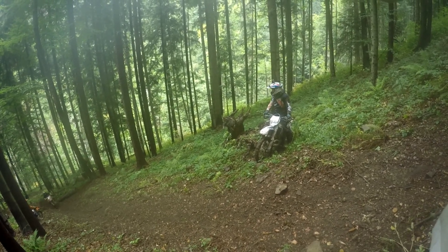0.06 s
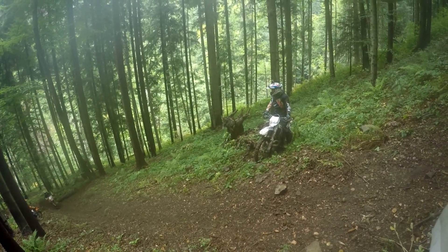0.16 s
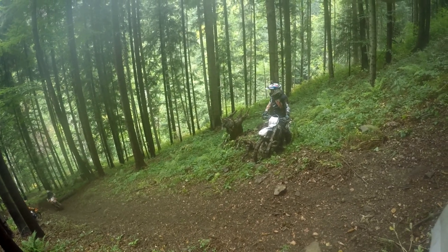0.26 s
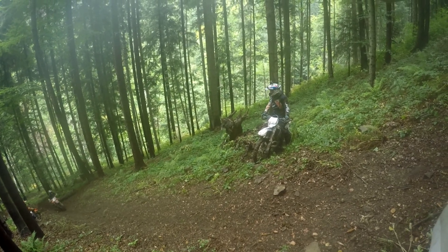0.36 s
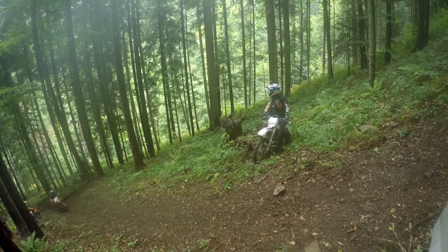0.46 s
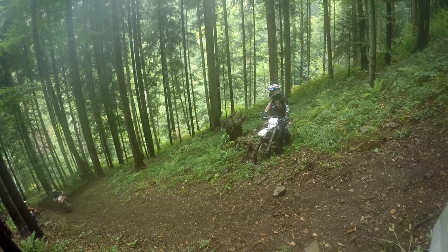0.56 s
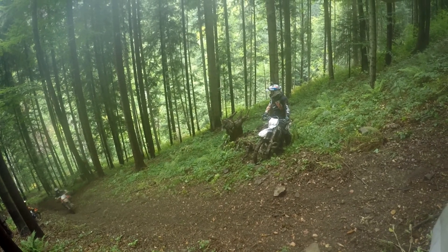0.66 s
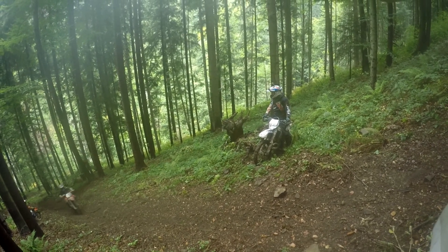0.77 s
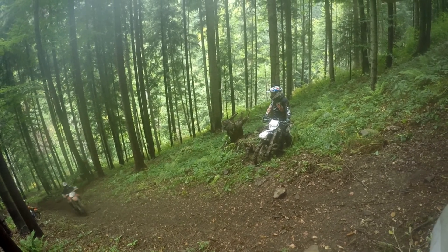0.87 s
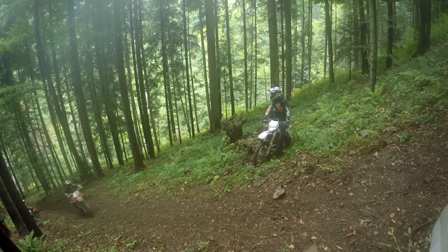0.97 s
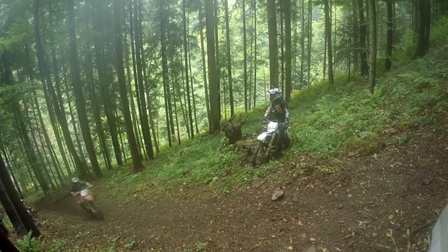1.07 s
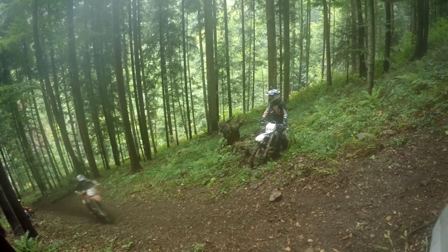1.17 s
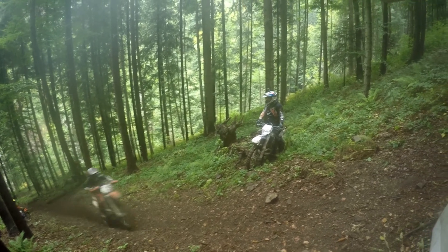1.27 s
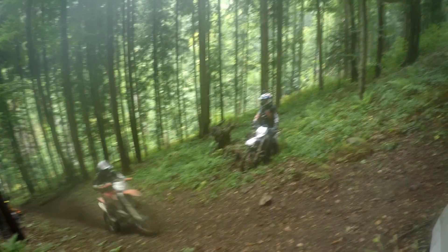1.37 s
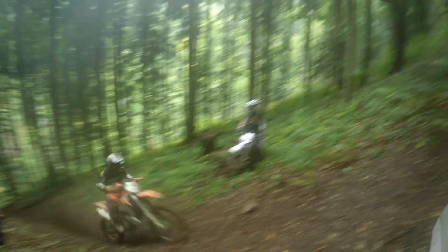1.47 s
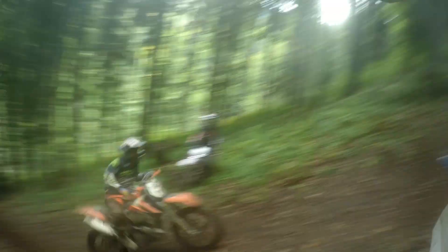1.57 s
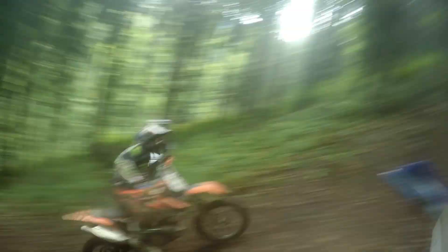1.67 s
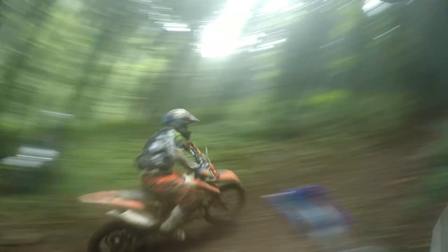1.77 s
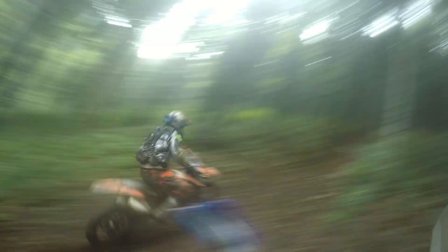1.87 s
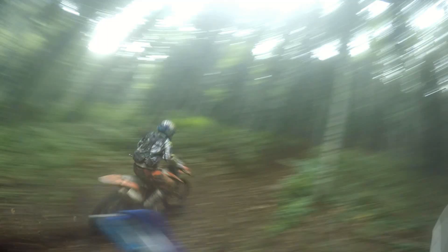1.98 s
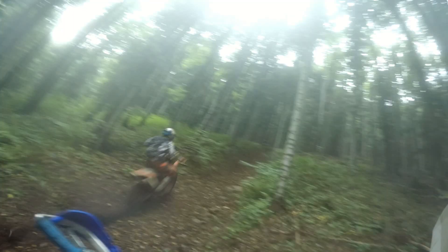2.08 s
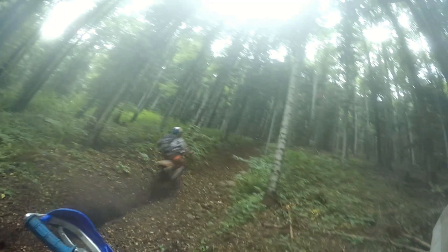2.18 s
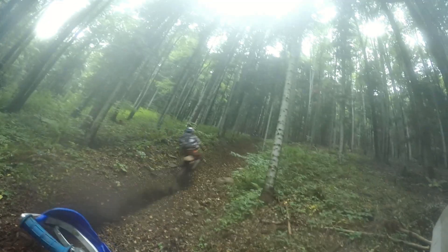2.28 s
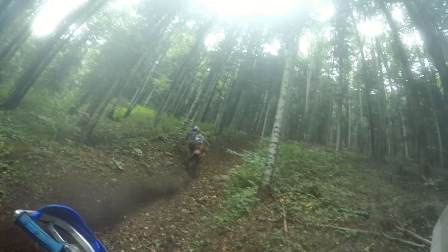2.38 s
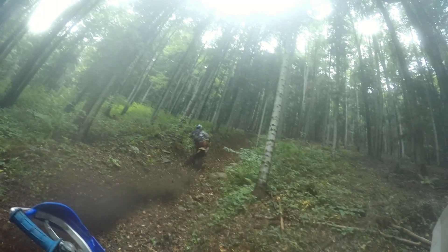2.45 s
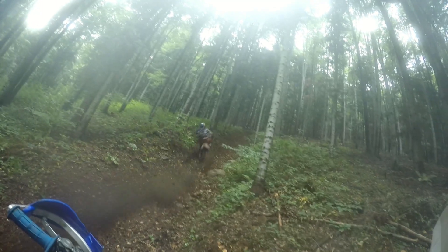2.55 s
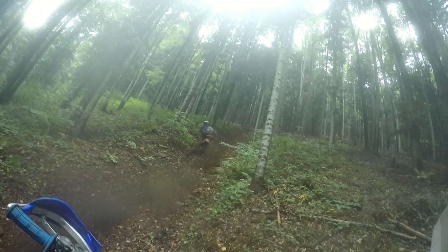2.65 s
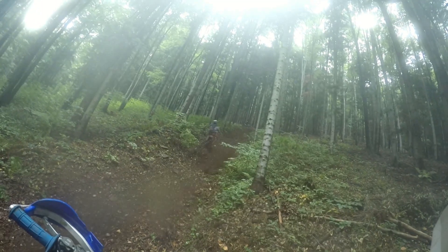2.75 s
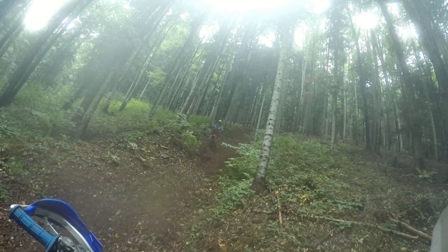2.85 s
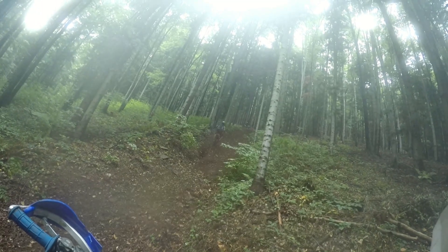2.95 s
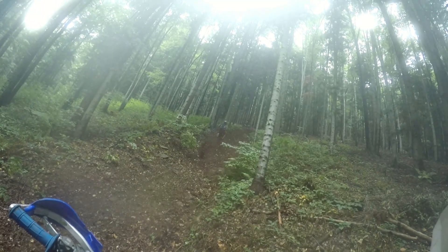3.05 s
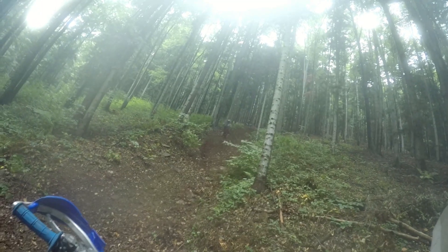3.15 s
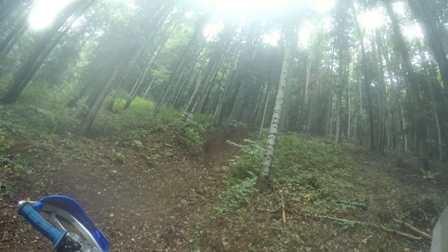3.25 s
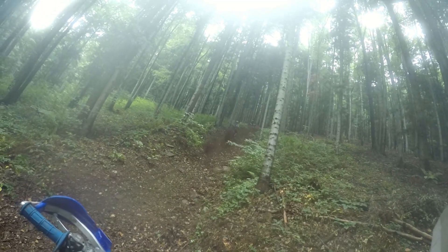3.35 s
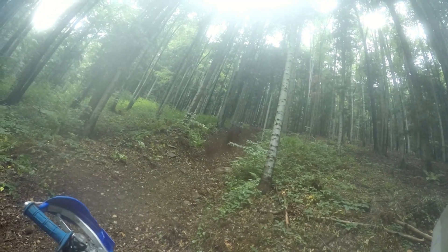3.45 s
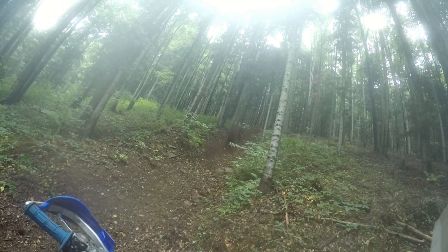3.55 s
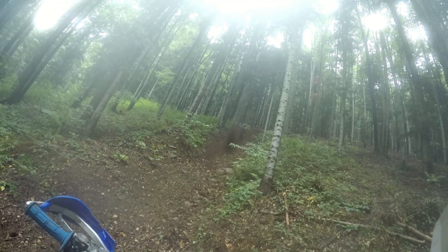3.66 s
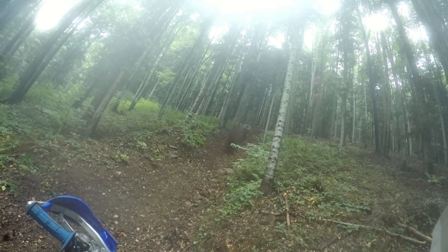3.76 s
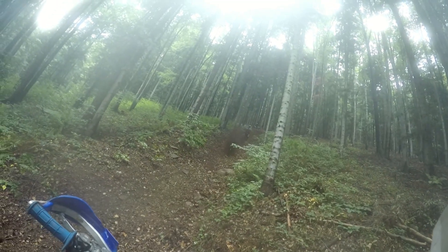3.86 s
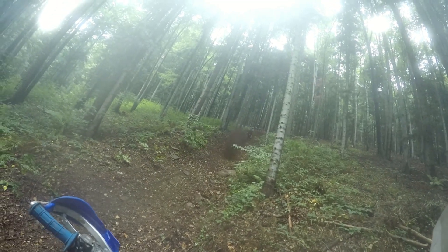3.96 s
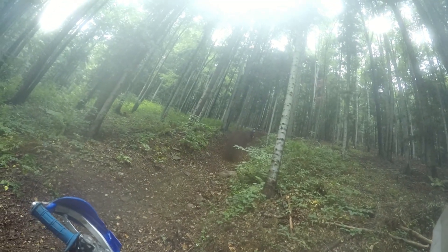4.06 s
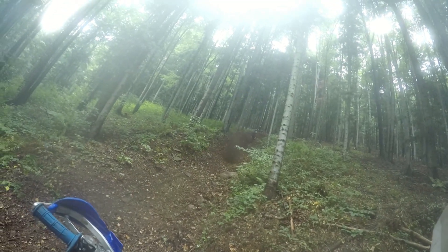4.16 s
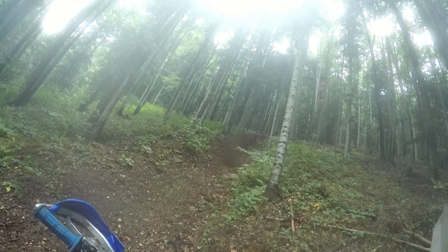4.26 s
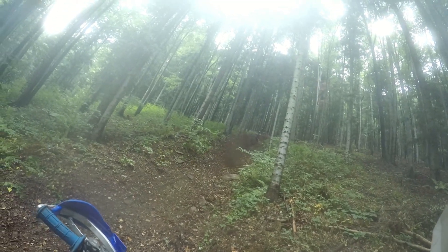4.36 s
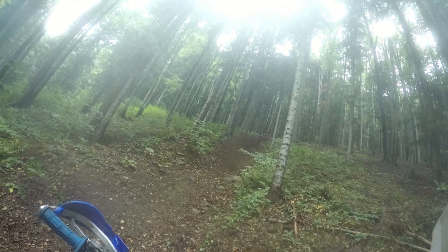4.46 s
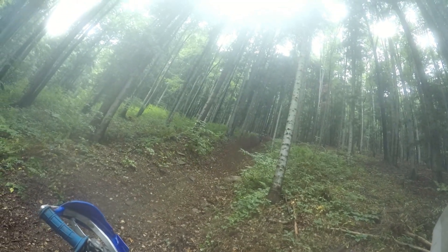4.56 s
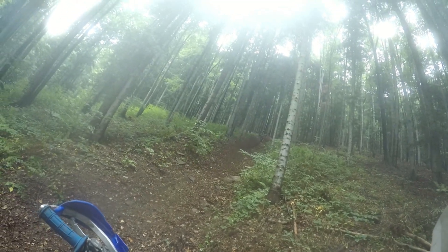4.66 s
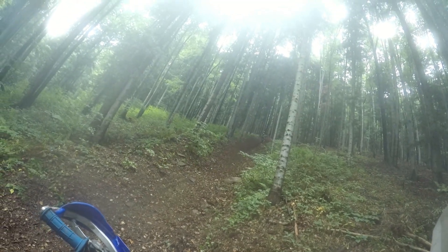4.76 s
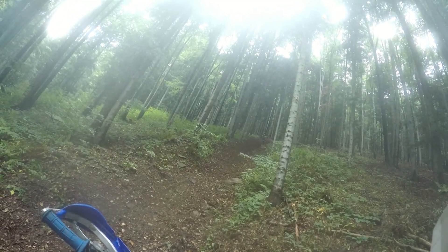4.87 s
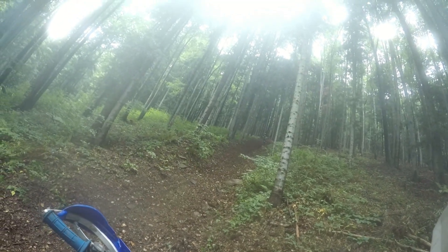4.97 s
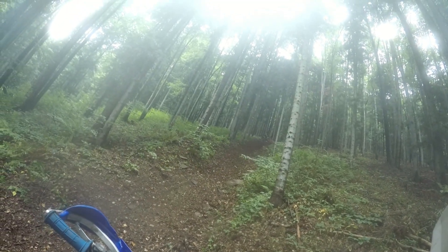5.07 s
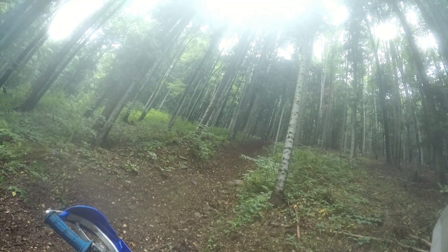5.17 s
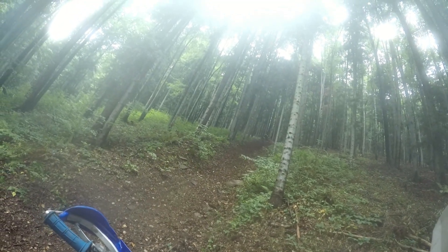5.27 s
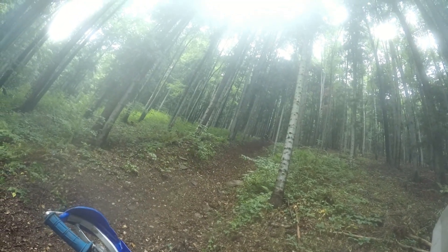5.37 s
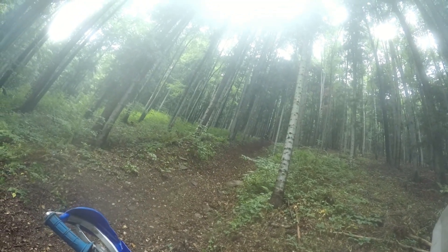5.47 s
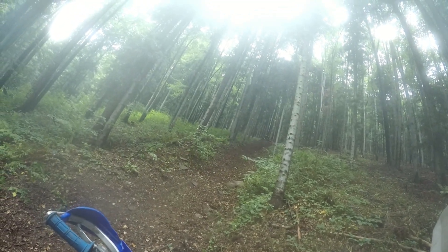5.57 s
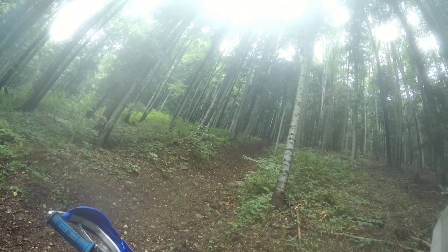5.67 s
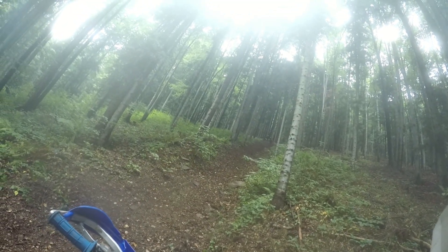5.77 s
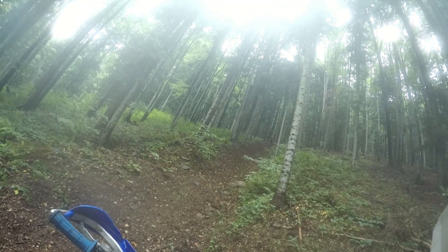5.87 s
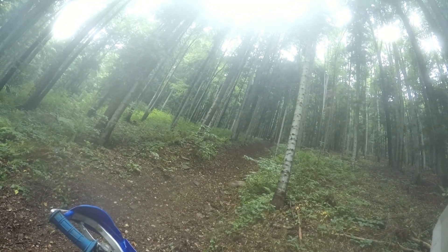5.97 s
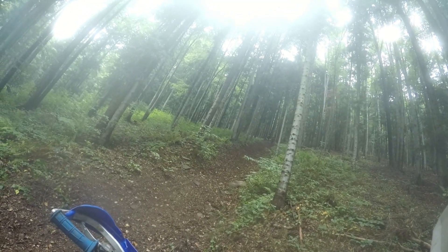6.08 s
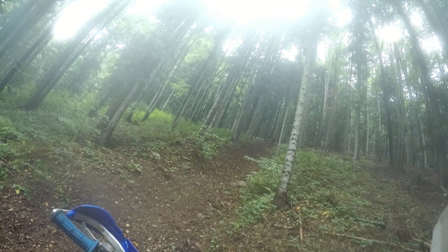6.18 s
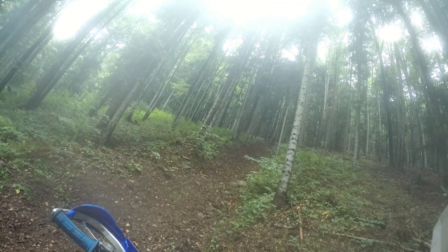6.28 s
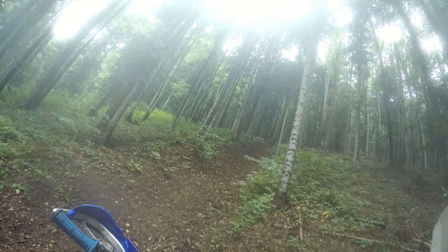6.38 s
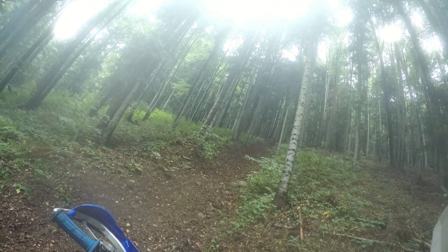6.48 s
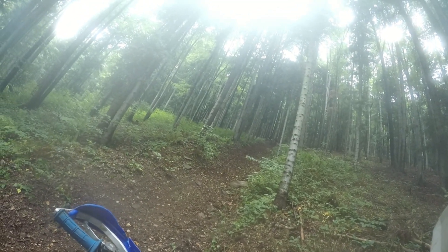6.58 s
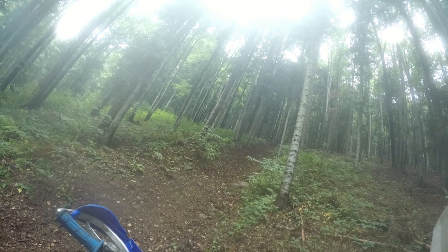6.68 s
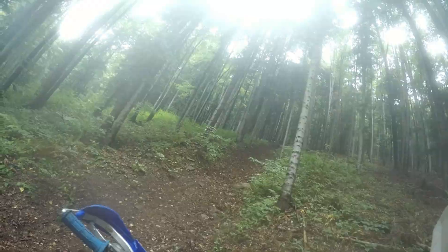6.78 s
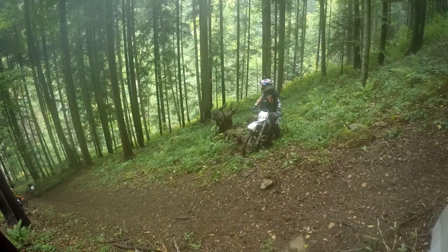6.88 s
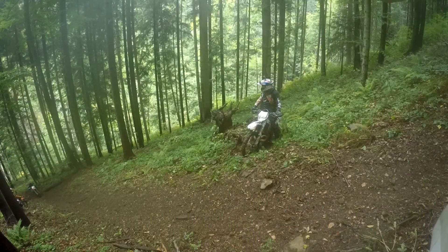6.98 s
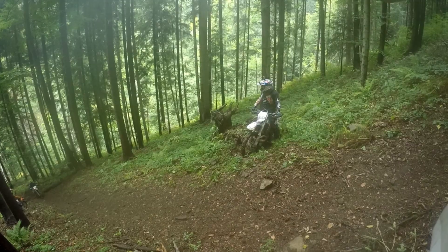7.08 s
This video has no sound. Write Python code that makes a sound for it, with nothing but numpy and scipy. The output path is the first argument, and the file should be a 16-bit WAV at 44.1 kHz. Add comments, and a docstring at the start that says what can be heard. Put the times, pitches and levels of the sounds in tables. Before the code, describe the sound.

In a hushed forest, a dirt bike approaches under hard throttle, its buzzing bark swelling to a harsh roar as it passes very close. It pulls away, shuts off briefly with a sharp crack, reopens and climbs steadily into the distance. Over a brow it drops to a faint putter, picks up weakly, then abruptly a different, quiet, low-revving bike is heard far off. Wind buffets the stationary microphone at the trailside.

```python
"""A forest trail: a dirt bike climbs, passes close by and rides off over a brow, shutting and opening the throttle.
Each firing is a pressure spike plus a puff of gas, coloured by the exhaust and scattered by trunks.
Low orders are sines with rough noise; off the throttle come an overrun whine, cracks, a pop and putter.
At 6.906 s the scene cuts to a second bike, lugging far down the trail. Light wind and forest hush run throughout."""
import sys
import numpy as np
from scipy import signal
from scipy.fft import rfft, irfft, next_fast_len
from scipy.io import wavfile
from scipy.ndimage import map_coordinates

SR = 44100
rng = np.random.default_rng(int(sys.argv[2]) if len(sys.argv) > 2 else 0)


def digitize_waveform(pressure):
    """Quantize a signal to 16-bit integers and store it at the path in sys.argv[1].

    Rows of a 2-D input are taken as channels; values are limited to [-1, 1].
    """
    field = np.atleast_2d(pressure).T
    bounded = np.clip(field, -1, 1)
    quanta = np.round(bounded * 32767).astype(np.int16)
    wavfile.write(sys.argv[1], SR, quanta)


N = 314697
T = np.arange(N) / SR

# silencer chambers: (round trip [s], share sent back [0-1])
CHAMBERS = [(.00073, .3)]
# longer path heard from behind: (round trip [s], share sent back [0-1])
TAILPIPE = [(.00171, .36)]
REAR_FROM_S, REAR_FADE_S = 2.2, 0.015
# brief bark level changes: (time [s], rise [dB], half length [s])
BARK_SWELLS = [(1.05, -1, 0.15), (1.44, 2, 0.055), (2.48, 0.5, 0.062), (4.03, 2, 0.19), (6.4, 2.5, 0.062)]


def exhaust(turns):
    """Pitched bark of pressure spikes; towards the treble, puffs of gas take over."""
    scattered, hiss = diffuse("scatter"), diffuse("hiss")
    spikes = ringing(firings(turns, scatter_db=1.1, slip_s=0.000014), CHAMBERS)
    from_behind = ringing(spikes, TAILPIPE)
    spikes = blend(spikes, from_behind, (T - REAR_FROM_S) / REAR_FADE_S)
    spikes = bounced(scatter(spikes, scattered, t60=0.19))
    # scattering smears the puffs into plain hiss
    gas = blend(puffs(turns, life=1.0), rng.standard_normal(N), scattered)

    bark_mix = blend(spikes, gas, 0.05 + 0.1 * hiss ** 6)
    rasp_mix = blend(spikes, gas, 0.03 + 0.82 * hiss)
    sizzle_mix = blend(spikes, gas, (3 + hiss) / 4)
    bark = aimed(bark_mix, lambda hz: below(hz, 2400))
    rasp = aimed(rasp_mix, lambda hz: below(hz, 7500) - below(hz, 2400))
    sizzle = aimed(sizzle_mix, lambda hz: 1 - below(hz, 7500))

    bark_db = loudness("bark") + swells(BARK_SWELLS)
    return amp(bark_db) * bark + amp(loudness("rasp")) * rasp + amp(loudness("sizzle")) * sizzle


def firings(turns, scatter_db, slip_s):
    """One band-limited spike per firing, each a little different in size and time; rms 1."""
    at = np.interp(np.arange(1, int(turns[-1])), turns, np.arange(N))
    chance = rng.standard_normal((len(at), 2))
    size = np.sqrt(np.gradient(at)) * amp(scatter_db * chance[:, 0])
    at = at + slip_s * SR * chance[:, 1]
    # windowed sinc places each spike between samples
    taps = np.floor(at)[:, None] + np.arange(-7, 9)
    offset = taps - at[:, None]
    shape = np.sinc(offset) * np.cos(np.pi * offset / 16) ** 2
    index = np.clip(taps, 0, N - 1).astype(int).ravel()
    return unit(np.bincount(index, (size[:, None] * shape).ravel(), N))


def puffs(turns, life):
    """Turbulent gas that bursts at each firing and decays over life [turns]; rms 1."""
    return unit(rng.standard_normal(N) * np.exp(-(turns % 1) / life))


def ringing(x, paths):
    """Allpass round trips draw each spike out into a metallic ring."""
    def response(hz):
        trips = [(np.exp(-2j * np.pi * hz * trip_s), back) for trip_s, back in paths]
        return np.prod([(z - back) / (1 - back * z) for z, back in trips], axis=0)
    return filtered(x, response)


# side facing the listener: (time [s], side [0 front, 1 flank, 2 rear quarter, 3 rear])
FACING = [(1.3, 0), (1.7, 1), (2.08, 1), (2.24, 2), (2.5, 2), (3, 3)]
# exhaust colour from each side: (frequency [Hz], gain [dB])
FRONT = [(650, -2), (850, -13), (1000, -7.5), (1250, 5), (1900, -1), (2300, -4), (3000, -2.5), (3800, -2),
         (4700, -5), (6500, -11.5), (8800, -14), (15000, -19.5)]
FLANK = [(650, -20), (850, -8.5), (1000, -10), (1250, 2), (1900, -7.5), (2300, -0.5), (3000, 4.5),
         (3800, -0.5), (4700, 0.5), (6500, -4), (8800, -21), (15000, -24.5)]
QUARTER = [(650, -16), (850, -0.5), (1000, -4.5), (1250, -1), (1900, -1), (2300, -3), (3000, -0.5),
           (3800, -2), (4700, -8.5), (6500, -14), (8800, -31), (15000, -40.5)]
REAR = [(650, 2), (850, -5), (1000, -10), (1250, -2.5), (1900, -3.5), (2300, 0), (3000, -5.5), (3800, 0),
        (4700, -6.5), (6500, -17), (8800, -45), (15000, -53)]


def aimed(x, band):
    """One exhaust band, changing colour as the bike turns from front to rear."""
    facing = curves(FACING)[0]
    out = np.zeros(N)
    for side, spectrum in enumerate([FRONT, FLANK, QUARTER, REAR]):
        share = 1 - abs(facing - side)
        heard = share > 0
        out[heard] += share[heard] * pipe(x[heard], spectrum, band)
    return out


# fixed peaks and notches: (centre [Hz], width [Hz], gain [dB])
RESONANCES = [(1300, 27, 2.5), (1658, 12.3, -26), (1999, 285, 8), (2286, 210, -5), (2653, 94, 8.5),
              (2856, 255, -10.5), (2990, 120, 7), (4160, 740, -1.5), (4660, 290, 4), (5280, 150, -9),
              (5332, 90, 11.5), (5960, 190, -2.5), (6420, 140, 5.5), (10510, 640, 7)]


def pipe(x, spectrum, band=lambda hz: 1, lag_s=0.001638, lag_hz=5000):
    """Pulses take on the pipe's colour and fixed resonances; their lows trail their highs."""
    hz = np.fft.rfftfreq(2048, 1 / SR)
    resonance_db = sum(db * np.exp(-((hz - centre) / width) ** 2) for centre, width, db in RESONANCES)
    gain = colour(spectrum, hz) * amp(resonance_db) * (1 - below(hz, 742))
    # folded cepstrum gives minimum phase
    cepstrum = irfft(np.log(np.maximum(gain, 1e-4)))
    cepstrum[1:1024] *= 2
    cepstrum[1025:] = 0
    sweep = np.exp(2j * np.pi * lag_s * lag_hz * np.exp(-hz / lag_hz))
    ring = np.fft.fftshift(irfft(np.exp(rfft(cepstrum)) * sweep * band(hz)))
    return signal.oaconvolve(x, ring / np.linalg.norm(ring), mode="same")


# ground reflection: (time [s], delay [ms], strength [0-1])
GROUND = [(1.72, 0.23, 0.24), (1.87, 0.35, 0.3), (1.95, 0.51, 0.35), (2.02, 0.7, 0.38), (2.28, 0.76, 0.31),
          (2.55, 0.7, 0.8)]


def bounced(x, soil_hz=3400):
    """Ground reflection sweeps a comb through the note; loose soil swallows its treble."""
    delay_ms, strength = curves(GROUND)
    late = np.interp(T - delay_ms / 1000, T, filtered(x, lambda hz: below(hz, soil_hz)))
    return (x + strength * late) / np.sqrt(1 + strength ** 2 / 2)


# brief narrow resonances: (time [s], rise [dB], half length [s], centre [Hz], width [Hz])
GLINTS = [(0.26, 9.5, 0.67, 2895, 130), (0.97, 10.5, 0.043, 1345, 102), (1.21, 7, 0.14, 1280, 100),
          (1.14, 11, 0.042, 1800, 64), (1.2, 9, 0.39, 5624, 121), (1.53, 9.5, 0.051, 5400, 150),
          (1.53, 9, 0.12, 8000, 288), (1.8, 11, 0.06, 1725, 170), (0.44, 6, .12, 1846, 110),
          (1.43, 6, 0.033, 1830, 102), (4.1, 4, 0.061, 1160, 88), (3.16, 6, 0.042, 1920, 113),
          (4.05, 5, .1, 1695, 270), (4.69, 5, 0.36, 1800, 99), (1.869, 9, .04, 2470, 214),
          (1.92, 8, 0.095, 3025, 123), (2.24, 7.5, 0.14, 3110, 188), (2.218, 4.5, 0.11, 5430, 400),
          (2.24, 7.5, 0.081, 2630, 88), (4.045, 9, 0.046, 2420, 280), (5.35, 9.5, 0.11, 3360, 210)]


def glinting(x):
    """Narrow bands of the exhaust brighten briefly, each at its own time."""
    out = x
    for s, db, half_s, centre, width in GLINTS:
        narrow = filtered(x, lambda hz: np.exp(-((hz - centre) / width) ** 2))
        out = out + (amp(swells([(s, db, half_s)])) - 1) * narrow
    return out


# second-order level: (time [s], rise [dB], half length [s])
SECOND_SWELLS = [(1.15, 1.5, .15), (1.53, -8, .11), (1.78, -8, .06), (3.1, 3, .2)]
# drone level: (time [s], rise [dB], half length [s])
DRONE_SWELLS = [(.42, 3, .12), (1.1, 2, .13), (1.42, -5, .17), (1.77, -3, .06), (3.22, 2, .08),
                (4.4, -2.5, .6)]
# flutter scale: (first order [dB], second order [dB], drone [dB])
FLUTTER_DB = 2, 3.5, 2.5
# rough low exhaust flow: (frequency [Hz], gain [dB])
CHURN = [(100, -8.5), (200, -8), (330, -3.5), (480, 3), (580, 5.5), (720, -15.5), (1000, 0), (1600, -44.5)]
FLARE_HZ, FLARE_DB_PER_HZ = 152.7, 0.5  # above this firing rate the drone gets louder
LUG_HZ, LUG_DB_PER_OCTAVE = 95.3, 6.5  # first order peaks at this firing rate


def boom(turns, front_hz=440, rear_hz=535, width_hz=120, low_db=-1, churn_db=-9):
    """Clean low orders; the higher ones swell at the silencer's resonance and roughen with distance."""
    rate_hz = np.gradient(turns) * SR
    first_db = loudness("first") - LUG_DB_PER_OCTAVE * np.abs(np.log2(rate_hz / LUG_HZ))
    second_db = loudness("second") + swells(SECOND_SWELLS)
    flare_db = FLARE_DB_PER_HZ * np.maximum(rate_hz - FLARE_HZ, 0)
    drone_db = loudness("drone") + swells(DRONE_SWELLS) + flare_db

    silencer_hz = np.interp(curves(FACING)[0], [0.5, 2.5], [front_hz, rear_hz])
    order = np.arange(3, 9)[:, None]
    weight = 1 / (1 + ((order * rate_hz - silencer_hz) / width_hz) ** 4)
    tones = weight * np.sin(2 * np.pi * order * turns + order ** 2)
    drone = np.sum(tones, axis=0) / np.linalg.norm(weight, axis=0)
    far = diffuse("drone")
    drone = scatter(drone, far, t60=0.25)

    # trail bumps jolt the load, so levels flutter
    levels_db = zip([first_db, second_db, drone_db], FLUTTER_DB)
    first_db, second_db, drone_db = [db + depth_db * wobble(21.9) for db, depth_db in levels_db]
    low = amp(first_db) * np.sin(2 * np.pi * turns) + amp(second_db) * np.cos(4 * np.pi * turns)
    clean = np.sqrt(2) * (amp(low_db) * low + amp(drone_db) * np.sqrt(1 - far / 2) * drone)
    return clean + amp(drone_db + churn_db) * np.sqrt(2 * far) * noise(CHURN)


# levels at the nearest distance: (front [dB], flank [dB], rear quarter [dB], rear [dB],
# loss [dB per tenfold distance], share of a throttle drop followed [ratio])
VOICES = {"bark": (-21, -22, -21, -15.5, 15, 1.5), "rasp": (-19.5, -16, -20, -14, 15.5, 1.28),
          "sizzle": (-33.5, -30.5, -35, -28, 21, 1.25), "first": (-27.5, -33, -26.5, -17.5, 28.5, 1),
          "second": (-29.5, -24, -35.5, -30, 24, 1), "drone": (-25, -27.5, -23, -15.5, 26.5, 1.4)}
BROW_S, BROW_FADE_S, BROW_DB = 4.986, 0.6, -6  # hill brow hides the bike


def loudness(voice):
    """Level [dB] of one exhaust voice from heading, distance, throttle and brow."""
    *sides_db, loss_db, follows = VOICES[voice]
    heading_db = np.interp(curves(FACING)[0], np.arange(len(sides_db)), sides_db)
    brow_db = BROW_DB * np.clip((T - BROW_S) / BROW_FADE_S, 0, 1)
    return heading_db - loss_db * np.log10(distance() / NEAREST_M) + follows * throttle() + brow_db


PASS_S, NEAREST_M, SPEED_M_PER_S = 1.646, 2.91, 10.55


def distance():
    """Distance [m] to a bike passing in a straight line at steady speed."""
    return np.hypot(NEAREST_M, SPEED_M_PER_S * (T - PASS_S))


# throttle lifts: (shut [s], reopen [s], drop [dB], closing time [s])
LIFTS = [(2.535, 2.875, -7, 0.06), (2.581, 2.632, -2, 0.051), (2.804, 3.068, -2.5, 0.25),
         (5.231, 6.227, -9.5, 0.4), (6.429, 6.762, -4, 0.032)]
REOPEN_S = 0.087


def throttle():
    """Drop [dB] from full throttle: each lift closes, holds and reopens."""
    total_db = 0
    for shut, reopen, db, close_s in LIFTS:
        closing = np.clip((T - shut) / close_s, 0, 1)
        total_db = total_db + db * closing * np.clip(1 - (T - reopen) / REOPEN_S, 0, 1)
    return total_db


# half-diffuse distance at full throttle: (pipe facing away [m], pipe facing listener [m])
CLEAR_M = {"scatter": (3.2, 40), "hiss": (1.2, 12), "drone": (7.5, 42)}
SWING_S, SWING_TIME_S = 1.83, 0.14


def diffuse(kind):
    """Diffuse share [0-1]: high when the bike is far, its pipe points away or the throttle is shut."""
    away_m, towards_m = CLEAR_M[kind]
    in_view = (1 + np.tanh((T - SWING_S) / SWING_TIME_S)) / 2
    clear_m = away_m * (towards_m / away_m) ** in_view * amp(throttle())
    return distance() ** 2 / (distance() ** 2 + clear_m ** 2)


def scatter(x, share, t60):
    """Part of the sound arrives via the trunks, along paths that change over time."""
    angle = np.pi * T / 0.45
    places = np.cos(angle) * trunks(x, t60) + np.sin(angle) * trunks(x, t60)
    return blend(x, places, share)


def trunks(x, t60):
    """Dense decaying echoes from the trees: convolution with a noise tail of unit energy."""
    t = np.arange(SR) / SR
    tail = rng.standard_normal(SR) * amp(-60 * t / t60) * (1 - np.exp(-t / 0.0005))
    return signal.fftconvolve(x, tail / np.linalg.norm(tail))[:N]


# putter: (time [s], level [dB])
PUTTER = [(5.66, -79.5), (5.69, -51), (5.9, -52.5), (5.99, -48.5), (6.12, -50), (6.22, -53), (6.28, -47),
          (6.42, -38), (6.46, -80)]


def putter(turns, life=0.37, gas_share=0.45):
    """A ringing spike and short puff per firing, as the engine lugs and picks up again."""
    spikes = ringing(firings(turns, scatter_db=1.5, slip_s=0.00003), TAILPIPE)
    beats = blend(spikes, puffs(turns, life), gas_share)
    return amp(curves(PUTTER)[0]) * unit(pipe(beats, REAR))


# eased throttle: (start [s], end [s], level [dB], order [multiple of firing rate])
OVERRUNS = [(2.67, 2.92, -46.5, 7), (5.68, 5.898, -65, 10), (6.179, 6.3, -62, 7), (6.56, 6.811, -61.5, 7)]


def overrun(turns, fade_s=0.029):
    """With the throttle eased, one high order of the firing rate sings out."""
    drift = 0.3 * wobble(40)
    tones = 0
    for start, end, db, order in OVERRUNS:
        fade = np.clip(np.minimum(T - start, end - T) / fade_s, 0, 1)
        tones = tones + amp(db) * fade * np.sin(2 * np.pi * round(order) * turns + drift)
    return amp(1.5 * wobble(25)) * np.sqrt(2) * tones


# cracks: (time [s], relative level [dB])
TICKS = [(2.6788, -11), (2.8586, -26), (5.5318, -28), (5.5777, -31), (5.6252, -26), (5.674, -32),
         (5.9723, -32), (5.9884, -27)]
# crack colour: (frequency [Hz], gain [dB])
CRACK = [(290, -71), (500, -74), (1480, -2), (2320, -7), (3940, -0.5), (6320, -14.5), (12300, -42),
         (14000, -50)]


def cracks(db=1):
    """Short dry noise bursts with instant attack, decaying 60 dB in 28 ms."""
    bursts = sum(amp(peak - 60 * np.abs(T - s) / 0.028) * (T >= s) for s, peak in TICKS)
    peak_gain_1 = lambda hz: colour(CRACK, hz) / colour(CRACK, hz).max()
    return amp(db) * filtered(bursts * rng.standard_normal(N), peak_gain_1)


# hollow pop: (frequency [Hz], level [dB])
POP = [(700, -19), (1090, -22), (1400, -16)]
POP_S = 2.374


def pop(length_s=0.002):
    """One hollow pop as the bike pulls away: sines under a Gaussian envelope."""
    t = T - POP_S
    return np.exp(-(t / length_s) ** 2) * sum(amp(db) * np.sin(2 * np.pi * hz * t) for hz, db in POP)


# second bike: (time [s], firing rate [Hz])
REVS_NEXT = [(6.92, 90.2), (7.13, 84.9)]
# second bike's exhaust colour: (frequency [Hz], gain [dB])
NEXT_PIPE = [(650, -6), (850, -19), (1000, -8), (1250, 0.5), (1900, -6), (2300, -11), (3000, -3.5),
             (3800, -9), (4700, -11.5), (6500, -17.5), (8800, -30), (15000, -46)]
# second bike's boom: (order [multiple of firing rate], level [dB])
NEXT_ORDERS = [(1, -4), (2, -3), (3, 1), (4, -11), (5, -5), (6, -15)]


def next_bike(db=-36.5, boom_db=-42):
    """A bike far down the trail at low revs: mostly scattered pulses over a fluttering boom."""
    turns = crank(REVS_NEXT, jitter=0.01385)
    spikes = firings(turns, scatter_db=1.0, slip_s=0.00005)
    pulses = blend(spikes, puffs(turns, life=0.31), share=0.41)
    note = pipe(blend(pulses, trunks(pulses, t60=1.0), share=0.78), NEXT_PIPE)
    low = sum(amp(level + 2.7 * wobble(25)) * np.sin(2 * np.pi * round(k) * turns + k * k)
              for k, level in NEXT_ORDERS)
    return amp(db) * note + amp(boom_db) * (unit(low) + amp(-8.5) * noise(CHURN))


# gusts on the microphone: (time [s], rise [dB], half length [s])
GUSTS = [(1.18, 5, 0.12), (1.65, 13, 0.42), (3.2, 10, 0.24)]
# wind buffet colour: (frequency [Hz], gain [dB])
BUFFET = [(15, 3), (30, 15), (45, 10.5), (65, 4), (120, -5), (300, -5), (1000, -54)]
# still forest air colour: (frequency [Hz], gain [dB])
FOREST = [(30, -27), (150, -39), (400, 7), (1000, -3), (4000, 2.5), (9000, -49), (15000, -37)]


def air(floor_db=-58, wind_db=-56.5):
    """Low, gusting wind noise on the microphone over the steady hush of the forest."""
    gusts_db = swells(GUSTS) + 2.2 * wobble(12)
    return amp(wind_db + gusts_db) * noise(BUFFET) + amp(floor_db) * noise(FOREST)


def crank(points, jitter, hunt=0.0098):
    """Firings counted since the start; tyre grip makes the speed hunt, under a faster jitter."""
    rate_hz = curves(points)[0] * (1 + jitter * wobble(70) + hunt * wobble(22))
    return np.cumsum(rate_hz) / SR


def amp(db):
    """Decibels to amplitude ratio."""
    return 10 ** (np.asarray(db) / 20)


def unit(x):
    """Scale to rms 1."""
    return x / np.sqrt(np.mean(x ** 2) + 1e-20)


def curves(rows):
    """One value per sample for each column after the time."""
    s, *cols = np.transpose(rows)
    return [np.interp(T, s, c) for c in cols]


def swells(rows):
    """Sum [dB] of Gaussian level bumps from (time [s], rise [dB], half length [s]) rows."""
    return sum(db * np.exp(-((T - s) / half_s) ** 2) for s, db, half_s in rows)


def wobble(rate):
    """Smooth random curve, rate knots per second."""
    return map_coordinates(rng.standard_normal(int(N * rate / SR) + 4), [T * rate])


def colour(spectrum, hz):
    """Gain of a (frequency [Hz], gain [dB]) colour, read on a log axis."""
    f, db = np.transpose(spectrum)
    return amp(np.interp(np.log(hz + 1), np.log(f), db))


def filtered(x, response):
    """Multiply the spectrum of x by a function of frequency."""
    m = next_fast_len(N + SR // 2)
    return irfft(rfft(x, m) * response(np.fft.rfftfreq(m, 1 / SR)), m)[:N]


def noise(spectrum):
    """Coloured noise of rms 1."""
    return unit(filtered(rng.standard_normal(N), lambda hz: colour(spectrum, hz)))


def blend(a, b, share):
    """Mix two unrelated sounds at constant power."""
    share = np.clip(share, 0, 1)
    return np.sqrt(1 - share) * a + np.sqrt(share) * b


def below(hz, edge_hz):
    """Steep low-pass gain."""
    return 1 / (1 + (hz / edge_hz) ** 20)


# first bike, in three stretches (approach, climb, far uphill): (time [s], firing rate [Hz])
REVS = [
    [(0.0, 132.9), (0.03, 129.2), (0.11, 141.3), (0.18, 129.8), (0.23, 140.8), (0.29, 129.8), (0.33, 157.1),
     (0.42, 139.4), (0.53, 144), (0.59, 129.7), (0.69, 135.5), (0.8, 128.7), (0.81, 143.4), (0.86, 144.1),
     (0.91, 135.3), (0.92, 140.7), (1.04, 152.4), (1.28, 146.4), (1.37, 155.4), (1.46, 140.7),
     (1.53, 155.6), (1.58, 143.4), (1.65, 169.2), (1.74, 159.5), (1.78, 136.5), (1.89, 150.5),
     (1.98, 136.3), (2.04, 141.1), (2.07, 123.5), (2.12, 148.1), (2.2, 124.1), (2.26, 138.1), (2.36, 138.2),
     (2.44, 125.9), (2.51, 152.4), (2.57, 152.7)],
    [(2.7, 95.8), (2.74, 91.6), (2.79, 97.0), (2.83, 94.0), (2.88, 97.1), (2.96, 111.6), (3.07, 106.9),
     (3.19, 145.4), (3.25, 141.2), (3.28, 133.2), (3.37, 137.6), (3.42, 143.4), (3.46, 141.6), (3.5, 117),
     (3.63, 150), (3.71, 134.8), (3.74, 124.9), (3.78, 133.9), (3.86, 134.2), (3.9, 129.3), (3.98, 155.8),
     (4.08, 142.8), (4.12, 126.9), (4.24, 145.3), (4.28, 135.3), (4.36, 154.2), (4.46, 134.7),
     (4.56, 132.2), (4.67, 136.9), (4.7, 132.8), (4.88, 130.4), (4.97, 139.2), (5.04, 136.0), (5.06, 129.4),
     (5.19, 116.6), (5.29, 124.6)],
    [(5.42, 90.3), (5.52, 63.8), (5.7, 65.9), (5.9, 68.6), (5.98, 75), (6.12, 76.7), (6.2, 91.9),
     (6.31, 109), (6.42, 120.3), (6.5, 83.4), (6.65, 99.1), (6.76, 101.7), (6.81, 110.6), (6.9, 117.2)],
]
# boom breaks off as the throttle shuts: (time [s], rise [dB], half length [s])
BREAKS = [(2.62, -16, .035), (5.42, -14, .09)]
CHANGE_S = 6.906


def scene():
    """The passing bike with its forest echo, a cut to the second bike, and air throughout."""
    turns = crank(np.vstack(REVS), jitter=0.004, hunt=0.003)
    bike = glinting(exhaust(turns) + putter(turns))
    bike = bike + amp(swells(BREAKS)) * boom(turns)
    bike = bike + overrun(turns) + cracks() + pop()
    bike = bike + amp(-17) * trunks(bike, t60=0.7)
    mono = np.where(T < CHANGE_S, bike, next_bike()) + air()
    return np.array([mono, mono])


TOP_HZ = 15350


def record(dry):
    """Round off the highest peaks, cut everything above TOP_HZ, same signal on both channels."""
    rounded = dry[0] / (1 + (dry[0] / 0.85) ** 4) ** (1 / 4)
    return np.tile(filtered(rounded, lambda hz: hz < TOP_HZ), (2, 1))


dry = scene()
out = record(dry)
digitize_waveform(out)
```